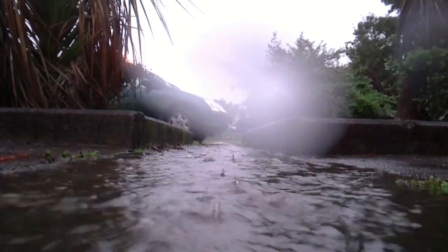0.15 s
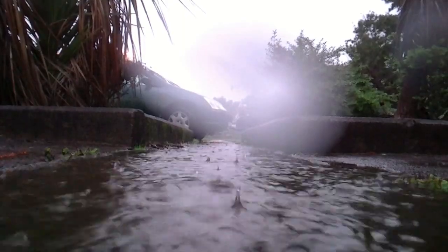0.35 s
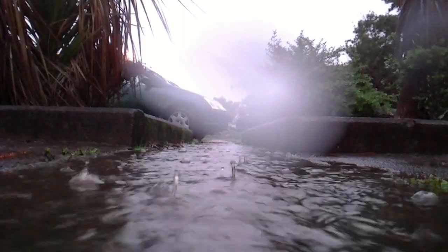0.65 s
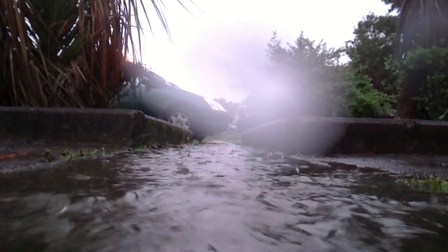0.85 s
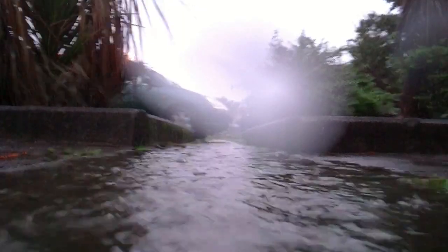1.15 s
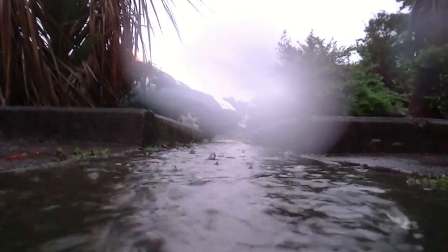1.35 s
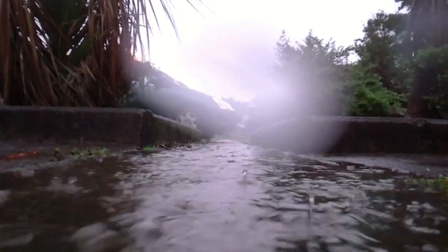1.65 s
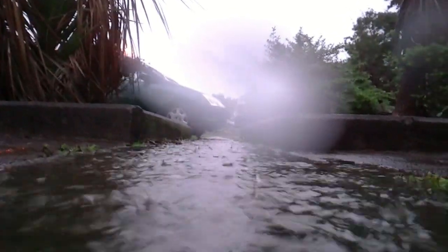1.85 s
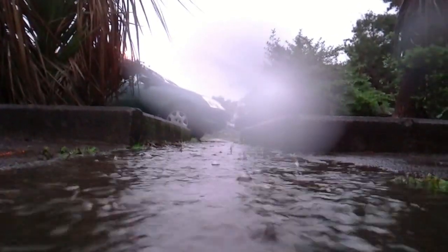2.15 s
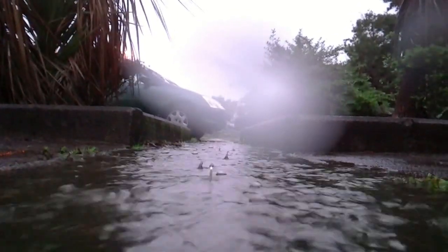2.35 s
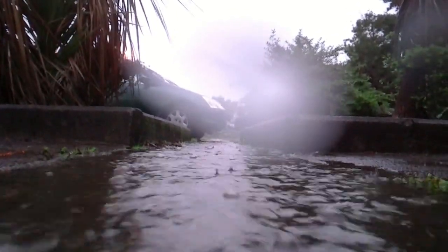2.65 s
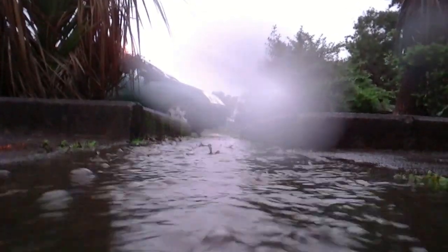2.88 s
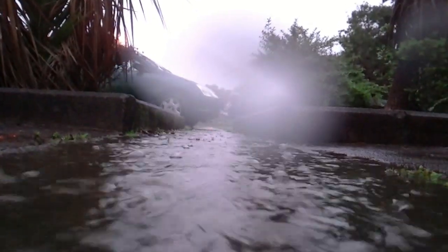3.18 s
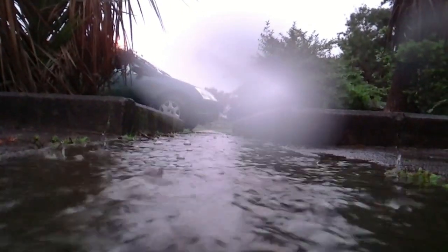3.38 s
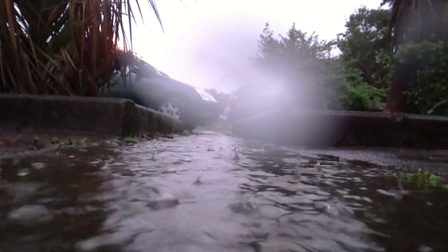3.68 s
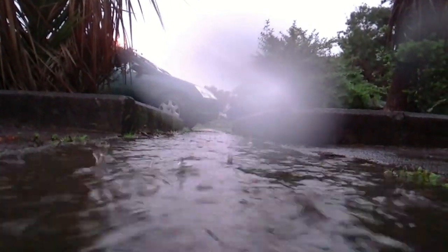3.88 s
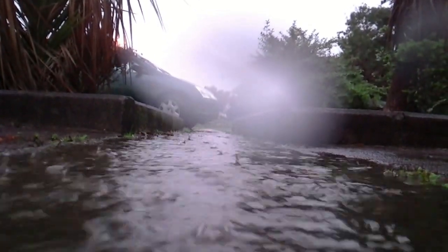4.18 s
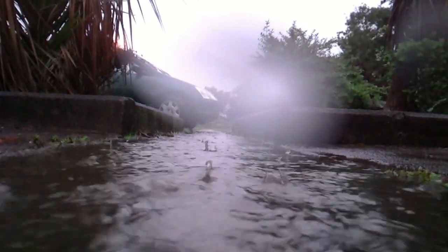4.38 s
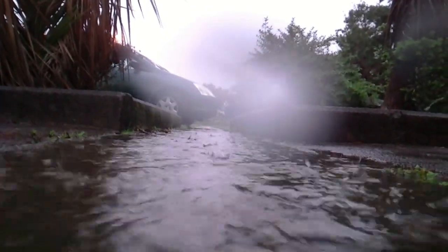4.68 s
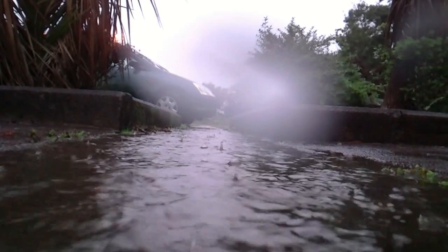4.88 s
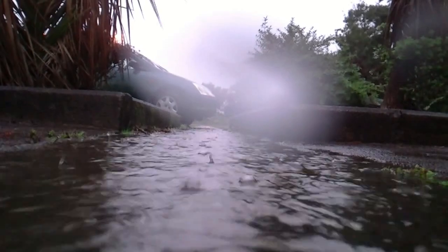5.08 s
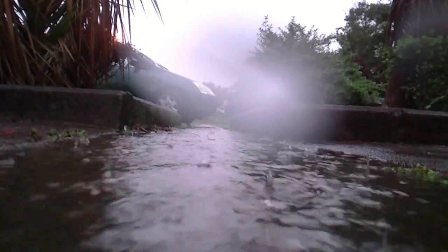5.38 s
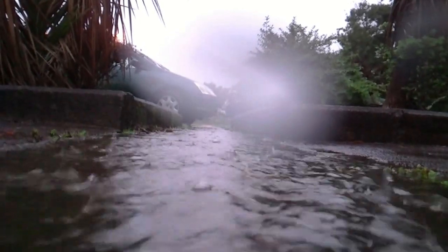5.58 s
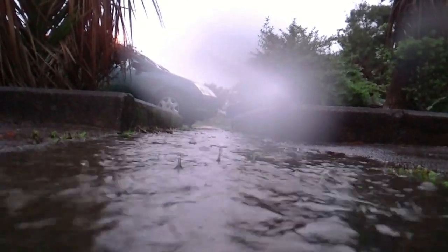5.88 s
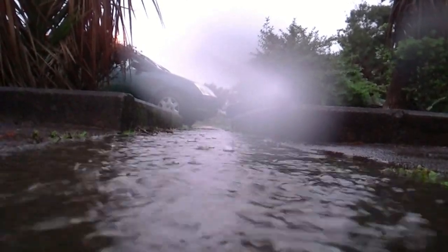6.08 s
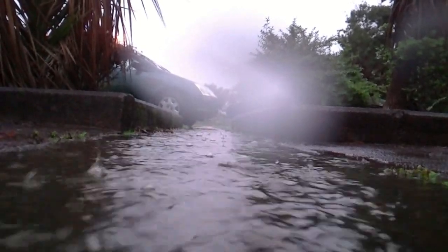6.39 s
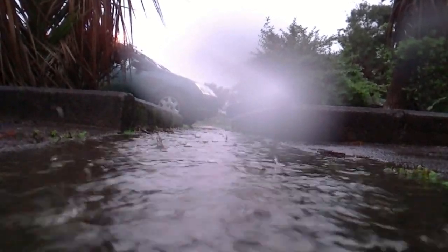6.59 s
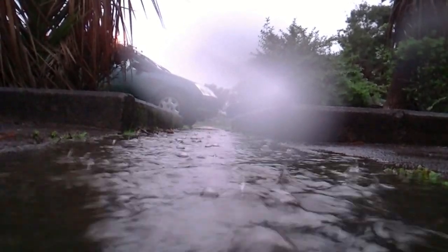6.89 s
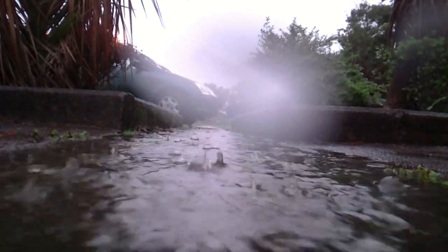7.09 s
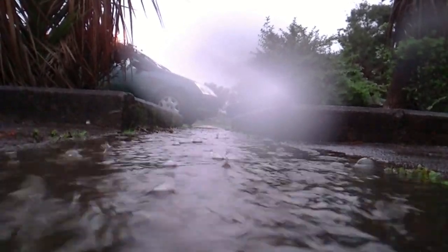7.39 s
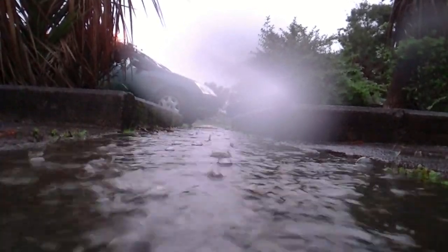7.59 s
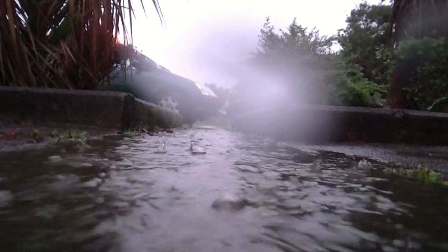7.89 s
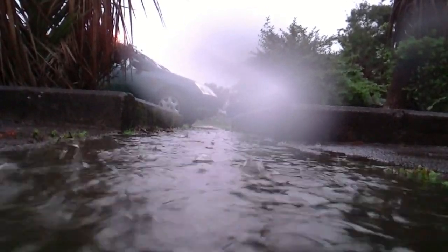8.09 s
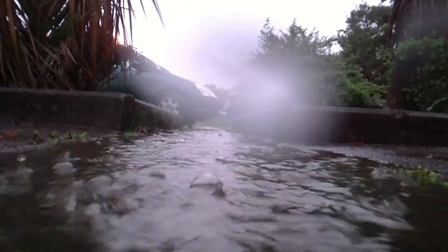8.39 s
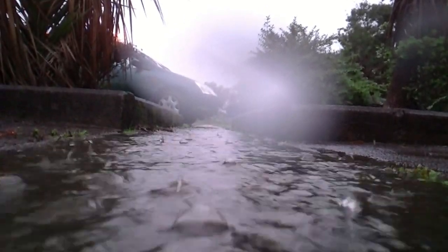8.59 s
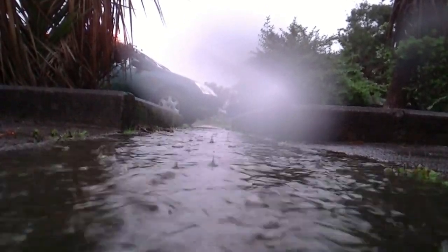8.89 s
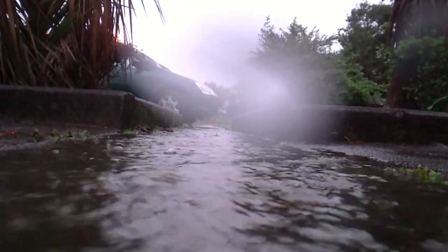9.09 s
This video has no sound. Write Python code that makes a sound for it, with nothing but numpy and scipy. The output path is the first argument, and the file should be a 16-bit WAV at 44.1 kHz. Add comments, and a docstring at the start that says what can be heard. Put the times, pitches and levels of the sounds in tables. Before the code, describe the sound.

A continuous bed of churning runoff and crackling rain, heard just above the water from inside a sealed case. Irregular knocks, splashes and quick round bubble pops fall in uneven clusters, thick in the first seconds, sparser around three to four. Bright stony pings stand out near five seconds. The rain swells slightly around two and a half seconds and again towards the end.

```python
"""Storm water runs down a street gutter in heavy rain, heard from a camera in a waterproof case just above the flow.
Throughout, current and far rain rush as shaped noise; near drops knock the case's resonances and air bubbles plop as
damped sines. Two thin warbles pass in the first second, and near 0.9 s a very hard drop makes the limiter duck it all.
The rain swells near 2.5 s, then eases; the strongest pings off wet stone come around 5 s. Another very hard drop
lands near 7.5 s, and the rain swells again before the end. A few low gulps of air dot the flow."""
import sys
import numpy as np
from scipy import signal
from scipy.fft import rfft, irfft, next_fast_len
from scipy.io import wavfile
from scipy.ndimage import uniform_filter1d, minimum_filter1d, map_coordinates

SR = 44100
rng = np.random.default_rng(int(sys.argv[2]) if len(sys.argv) > 2 else 0)


def pcm_store(signal):
    """Save signal as 16-bit PCM."""
    levels = np.round(np.clip(np.atleast_2d(signal), -1, 1) * 32767)
    wavfile.write(sys.argv[1], SR, levels.astype(np.int16).T)


N = 407925
TIME = np.arange(N) / SR

# big air bubbles: (time [s], level [dB], pitch [Hz], ring time to -60 dB [s], initial relative pitch rise [1/s])
BUBBLES = [(0.001, -10.5, 1426, 0.04, 5), (0.033, -21.5, 1470, 0.014, 3), (0.245, -30, 2044, 0.15, -3),
           (0.344, -20, 2430, 0.021, 3), (0.51, -9, 2470, 0.024, -3), (0.5422, 6.5, 2670, 0.02, -16),
           (0.6766, -17.5, 1690, 0.028, 0), (0.7168, -15.5, 3260, 0.025, 1), (0.74, -3.5, 2330, 0.039, -10),
           (0.778, -8, 3020, 0.02, -7), (0.8069, -0.5, 1576, 0.068, -5.5), (0.8799, -5.5, 1560, 0.016, 17),
           (0.899, 12, 1980, 0.011, -4), (0.905, -17, 1292, 0.075, 0), (0.938, -7, 2400, 0.036, -6),
           (0.9495, -8, 2200, 0.041, 9), (0.989, -2.5, 1212, 0.081, 5.5), (0.9987, 1, 1127, 0.05, 28.5),
           (1.009, -4.5, 1360, 0.034, 17), (1.055, -1, 1390, 0.049, 10.5), (1.143, -12, 2680, 0.028, 4),
           (1.21, 5, 1445, 0.025, 5), (1.2176, -0.5, 2330, 0.046, -3), (1.2336, -5, 2870, 0.024, -13),
           (1.2387, -4, 2630, 0.035, -5), (1.614, -24.5, 1540, 0.089, 2), (1.643, -12, 3020, 0.02, 10),
           (1.7746, -19, 1514, 0.17, 0), (1.8198, -14.5, 1380, 0.12, 10.5), (1.842, 1.5, 1272, 0.061, 10.5),
           (1.844, -8, 2930, 0.041, -7), (1.8573, -12.5, 1340, 0.092, 1.5), (1.8856, -10, 1230, 0.028, 19),
           (1.8994, -3.5, 1254, 0.043, 3), (1.911, -14, 1410, 0.054, -4), (1.9878, -11.5, 1630, 0.1, -13.5),
           (2.0634, -15.5, 2030, 0.026, -3), (2.0718, -16.5, 2770, 0.023, 0), (2.138, 1, 1365, 0.043, 17),
           (2.18, -3.5, 2630, 0.021, 15), (2.2346, -23.5, 1390, 0.066, 0), (2.323, -17, 2470, 0.038, 1),
           (2.4176, -13, 1460, 0.03, -2), (2.4301, -10, 2580, 0.028, -1), (2.458, -9, 2790, 0.022, -6),
           (2.538, -11.5, 1990, 0.022, -3), (3.028, -30, 1410, 0.15, 0), (3.0573, -9.5, 1515, 0.032, -13),
           (3.126, -24, 2070, 0.04, -5), (3.167, -15.5, 1970, 0.02, -4), (3.5721, 1, 1130, 0.021, 14),
           (3.5835, -2, 1247, 0.034, 8.5), (3.729, -13.5, 1525, 0.031, 7), (4.035, 3.5, 2120, 0.02, 5),
           (4.0675, -8.5, 1655, 0.058, -5.5), (4.192, -25, 1780, 0.05, 6), (4.233, -11.5, 1690, 0.031, 1),
           (4.454, -20.5, 1955, 0.049, -6), (4.55, -21, 1213, 0.05, 21), (4.714, -17.5, 1040, 0.033, 26),
           (4.9737, 1.5, 2010, 0.017, -16), (5.179, -5, 2250, 0.02, 1), (5.2438, 0.5, 1288, 0.059, 18),
           (5.415, -7, 1000, 0.024, 33), (5.5213, -11, 1430, 0.02, 10), (6.226, -8, 1625, 0.08, -1.5),
           (6.2425, -5, 1485, 0.029, 8), (6.262, -16, 1930, 0.042, -2), (6.29, -8, 1675, 0.062, -6),
           (6.357, -17, 2700, 0.035, 4), (6.928, -6.5, 2140, 0.018, 5), (7.142, -21, 1330, 0.089, -7.5),
           (7.1855, -12.5, 1530, 0.013, 5), (7.47, -20.5, 2730, 0.04, -4), (7.4905, 11, 1670, 0.035, 0.5),
           (7.5756, -3.5, 1425, 0.05, 8), (7.767, 2, 1495, 0.045, -0.5), (7.865, -16, 1180, 0.14, 10),
           (8.028, -14, 2820, 0.032, -6), (8.1549, -13.5, 1400, 0.025, -3), (8.438, -12, 1440, 0.014, -5)]


def amp(db):
    """Decibels to gain."""
    return 10 ** (np.asarray(db) / 20)


def unit(x):
    """Scale to rms 1."""
    return x / np.sqrt(np.mean(x ** 2) + 1e-20)


def blow(sounds, size=300):
    """Scale each row to rms 1 over its first 7 ms."""
    return sounds / np.sqrt(np.mean(sounds[:, :size] ** 2, axis=1, keepdims=True) + 1e-20)


def along(points, hz, axis=1):
    """Read one column of a frequency table on a log axis."""
    table = np.transpose(points)
    return np.interp(np.log(hz + 1), np.log(table[0] + 1), table[axis])


def wobble(rate):
    """A smooth random curve with rate knots a second."""
    return map_coordinates(rng.standard_normal(int(N * rate / SR) + 4), [TIME * rate])


def filtered(x, response):
    """Multiply the spectrum of x by a complex response of frequency."""
    n = x.shape[-1]
    padded = next_fast_len(n + n // 8)
    return irfft(rfft(x, padded) * response(np.fft.rfftfreq(padded, 1 / SR)), padded)[..., :n]


def scatter(times, sounds, pan_db, lag=0, side=None):
    """Lay a short sound at each time; positive side is louder and up to lag [s] earlier on the left."""
    if side is None:
        side = np.clip(rng.standard_normal((len(times), 1)), -2, 2) / 2
    else:
        side = side[:, None]
    loudness = np.sqrt((amp(2 * side * pan_db) + amp(-2 * side * pan_db)) / 2)
    index = np.arange(sounds.shape[1])
    channels = []
    for sign in (1, -1):
        start = np.round(np.abs(times[:, None] - sign * side * lag / 2) * SR).astype(int)
        panned = sounds * (amp(sign * side * pan_db) / loudness)
        channels.append(np.bincount((start + index).ravel(), panned.ravel(), N)[:N])
    return np.array(channels)


def near_drops(level_db, thud_db, spray_db):
    """Big drops land on and beside the case, each with its own force, thud and spray."""
    # drops: (time [s], force [dB], thud: low knock over case ring [dB], spray: splash over force [dB])
    drop_rows = [(0.1783, -27, -13, -2), (0.4946, -21.5, -20, -1), (0.5103, -25.5, -9, -29),
                 (0.538, -22.5, -4, -13), (0.715, -25, -6, -13), (0.7388, -16, -9.5, -20),
                 (0.7762, -15.5, 0, -7), (0.8059, -19, -8, 3.5), (0.8988, 2, -8, -7), (0.937, -11, -17, -9),
                 (0.994, -16, 14, -28), (1.059, -23.5, -3, -29), (1.099, -13.5, -6, -6.5),
                 (1.154, -26, -5, -3), (1.1852, -24, -11, -0.5), (1.2153, -13.5, -18, 3),
                 (1.2314, -16, -3, -4), (1.247, -8, -14, 0), (1.3048, -25, -10, -16), (1.324, -28, -17, -4),
                 (1.6424, -23.5, -5.5, -5), (1.703, -23.5, -9, -27), (1.743, -18.5, 5, -0.5),
                 (1.8172, -24, 8, -25), (1.8445, -23, 1, 8), (1.897, -17, 15, -6.5), (1.9862, -22, -1, -9),
                 (2.01, -19, -19, -38), (2.046, -22, -2, -3), (2.071, -23, -11, -22), (2.137, -24.5, -8, 0),
                 (2.179, -19, -11.5, -7), (2.293, -16.5, -11.5, -10), (2.32, -21.5, -15, 2.5),
                 (2.3696, -17.5, -6, -9), (2.389, -19, -1, -2.5), (2.4281, -20.5, -10.5, -23),
                 (2.457, -21.5, -6, 2), (2.4862, -1, -9.5, -4), (2.7305, -18.5, -2, -6),
                 (2.7391, -21, 10, -19), (2.7911, -24, -22, -6), (2.836, -24, -5, -16),
                 (2.949, -26.5, 1, -5), (3.056, -27.5, 14, 7), (3.1658, -29, -38, -5),
                 (3.332, -27, -22, -1), (3.3793, -27.5, -21, 1), (3.466, -23.5, -19, -2.5),
                 (3.4965, -16, -13.5, -9), (3.5693, -14.5, -1, -8.5), (3.654, -29, -2, -3),
                 (3.7258, -23, -3, 3), (3.9703, -25, -12.5, -11), (4.01, -25.5, -3, -1.5),
                 (4.0354, -13, -11, -4), (4.4724, -27, -4, -24), (4.6472, -28.5, -11.5, -0.5),
                 (4.808, -16, -15.5, -1.5), (4.837, -26, -12, -5), (4.8667, -16.5, -1.5, -10),
                 (4.9712, -18, -17, 9), (5.004, -13, -3.5, -2.5), (5.243, -20.5, -5, -11),
                 (5.3849, -15.5, -6.5, 3), (5.4141, -16.5, -8, -0.5), (5.4928, -20, -7.5, -27),
                 (5.698, -18.5, -4.5, -6.5), (5.9889, -32, -28, 0), (6.03, -29, -14, -2),
                 (6.0738, -25.5, -18, -4), (6.2297, -25.5, -7, -5), (6.2579, -24.5, -6, 0),
                 (6.355, -24, -22, -2), (6.3761, -26, -27, -6), (6.435, -31, -3, 0),
                 (6.8847, -25.5, -6.5, -13), (6.955, -23.5, 3, -1), (6.9802, -25, -17, 2),
                 (7.1227, -26, -1, -28), (7.2261, -11.5, -20.5, -9.5), (7.48, -23, 1, -13),
                 (7.4908, 0, 13, -5.5), (7.572, -24, 13, 11), (7.7637, -17, -10, -27),
                 (7.833, -14, -16.5, -17), (7.8838, -16.5, -20, -7.5), (7.901, -27.5, -8, 1),
                 (7.9854, -11.5, 7, -19), (8.0262, -22.5, -4, -37), (8.2228, -28.5, -8.5, 0),
                 (8.324, -6.5, -8, -11.5), (8.422, -22, 6, -4), (8.608, -23.5, -21, 4.5),
                 (8.707, -21, -18.5, -0.5), (8.77, -26, 0, 0), (8.8867, -24, 0, -10), (9.0748, -7, -9.5, 5),
                 (0.531, -22.5, 1, -5), (0.757, -26, -12, -8), (1.542, -30, 5, -15),
                 (1.574, -28.5, -10, -7), (1.722, -31, -3, -14), (1.828, -29, 2, -12), (2.119, -33, -15, 0),
                 (2.362, -23.5, -1, 7), (2.477, -23.5, -4, -6), (2.598, -28.5, 3, -26),
                 (2.874, -33, -13, -9), (3.074, -31, -6, 3), (4.536, -30.5, -10, -7), (4.588, -30, -3, -9),
                 (4.664, -30.5, -6, 4.5), (4.853, -28.5, 3.5, -5), (5.026, -27, -18, -15),
                 (5.079, -29, -10, -6), (5.473, -29, -13, 1), (5.534, -31, 5, -5), (5.581, -32.5, -3, 1),
                 (5.621, -33.5, -2, 6), (5.868, -31, -21, -3), (6.058, -30, -8, -10), (6.321, -31, -3, -3),
                 (6.679, -31.5, -22, -1), (6.937, -23.5, -23, -1), (6.969, -27, -9, -5),
                 (7.106, -28, -8, -8), (7.364, -30.5, -11, 3), (7.47, -25.5, -12, 2), (7.675, -26, -9, -13),
                 (7.933, -28, -10, -6), (8.073, -27.5, -2, -16), (8.574, -27, -17, -1),
                 (8.688, -27, -17, -6), (8.818, -31.5, -24, -6), (9.022, -29.5, -9, -7)]
    s, force, thud, spray = np.transpose(drop_rows)
    return landing(s, force + level_db, thud + thud_db, spray + spray_db)


def landing(s, force_db, thud_db, spray_db):
    """A drop's force is shared between low knock and case ring; splash and crack grow with its spray."""
    ring_db = force_db - 10 * np.log10(1 + amp(thud_db) ** 2)
    splash_db = force_db + spray_db
    crack_db = -18.5 + 0.58 * splash_db  # the crack grows more slowly than the splash
    return impacts(s, ring_db + thud_db, ring_db, splash_db, crack_db)


def impacts(s, knock_db, ring_db, splash_db, crack_db):
    """A drop cracks on contact, opens a small crater in the water and sets the case ringing."""
    # low resonances of the case: (centre [Hz], width [Hz], relative level [dB])
    knock_modes = [(279, 220, -13.5), (489, 116, -4.5), (687, 117, 1), (934, 476, -9)]
    # high resonances of the case: (centre [Hz], width [Hz], relative level [dB])
    ring_modes = [(1035, 154, 3), (1284, 326, 3.5), (1538, 132, 9.5), (1823, 260, -4), (2200, 420, -12)]
    # resonances of the splash: (centre [Hz], width [Hz], relative level [dB])
    splash_modes = [(2276, 159, 6.5), (2530, 800, -3.5), (3360, 200, -4)]
    count = len(s)
    # the hardest drops hit the case in one cleaner slap
    mess = np.interp(np.maximum(knock_db, ring_db), [-27, -17], [1, .25])[:, None]
    rim = mess * crown(count)
    knock_push = contact(count, t60=0.0051, rough=0.3 * mess) + rim
    knock = amp(knock_db)[:, None] * struck(knock_push, knock_modes, low_hz=102, detune=0.033)
    ring_push = contact(count, t60=0.003, rough=0.16 * mess) + rim
    ring = amp(ring_db)[:, None] * struck(ring_push, ring_modes, low_hz=700, detune=0.08)
    splash_push = contact(count, t60=0.013, rough=0.4 * mess) + rim
    splash = amp(splash_db)[:, None] * struck(splash_push, splash_modes, low_hz=1900, detune=0.08)
    crack = amp(crack_db)[:, None] * cracks(crack_db)
    # the case carries the low part to both ports nearly alike; the spray comes from either side
    return scatter(s, knock + ring, pan_db=1.2) + scatter(s, splash + crack, pan_db=6, lag=.00006)


def contact(count, t60, rough, size=1500):
    """The push of each drop: one sharp slap, then a brief irregular collapse."""
    t = np.arange(size) / SR
    push = rough * rng.standard_normal((count, size)) * amp(-60 * t / t60)
    push[:, 0] += 1
    return push


def crown(count, size=1500, order=3):
    """A few weaker slaps at uneven moments as the rim of the splash falls in."""
    latest_s, slap_db = .014, -8.5
    when = rng.uniform(.15, 1, (count, order))
    strength = rng.standard_normal((count, order))
    place = np.minimum(when * latest_s * SR, size - 1).astype(int) + size * np.arange(count)[:, None]
    slaps = amp(slap_db) * strength * (1 - when / 2)
    return np.bincount(place.ravel(), slaps.ravel(), count * size).reshape(count, size)


def struck(push, modes, low_hz, detune):
    """Pushes excite resonances, shifted a little by the water at each drop; the case dulls the top treble."""
    shift = 1 + detune * rng.uniform(-0.76, 1, (len(push), 1))

    def body(f):
        total = 0
        for k, (hz, width, db) in enumerate(modes):
            centre = hz * shift
            mode = 1j * f * width / (centre * centre - f * f + 1j * f * width)
            total = total + (-1) ** k * amp(db) * mode
        return total

    case = signal.butter(2, [low_hz, 6500], "band", fs=SR, output="sos")
    return blow(signal.sosfilt(case, filtered(push, body)))


def cracks(crack_db):
    """First contact gives a very short snap; only the hardest ones reach the top treble."""
    # spectrum of the snap: (frequency [Hz], relative level [dB])
    snap_spectrum = [(2500, -17), (3600, 6.5), (4400, 12), (5500, 5.5), (6500, 4.5), (7400, -4),
                     (9000, -13), (11500, -26), (13700, -20), (15500, -38), (16500, -68)]
    # above -16.5 dB a crack opens the top treble by 2.07 dB per dB
    hardness_db = np.clip(2.07 * (crack_db + 16.5), 0, 22)[:, None]
    push = contact(len(crack_db), t60=.008, rough=.5)
    # room for the snap to swell over a fraction of a millisecond before its peak
    push = np.roll(push, 30, axis=1)

    def colour(hz):
        top = np.interp(hz, [6500, 11000], [0, 1])
        return amp(along(snap_spectrum, hz) + hardness_db * top)

    return blow(filtered(push, colour))


def plops(level_db, life, sway, attack):
    """Big bubbles near the case ring until they burst; their swaying shape makes the ring swell and sag."""
    s, db, hz, t60, rise = np.transpose(BUBBLES)
    rings = ringing_air(db + level_db, hz, t60, rise, attack=attack, size=2600)
    t = np.arange(rings.shape[1]) / SR
    sway_hz = rng.uniform(60, 150, (len(s), 1))
    swell = 1 + sway * np.cos(2 * np.pi * sway_hz * t)
    burst = np.exp(-(t / life) ** 4)
    return scatter(s, rings * swell * burst, pan_db=0.5)


def ringing_air(db, hz, t60, rise, attack, size):
    """A bubble is a damped sine whose pitch climbs (or falls, if rise is negative) and then levels off."""
    glide_s = 0.0224  # time constant of the levelling off
    t = np.arange(size) / SR
    db, hz, t60, rise = (np.asarray(c)[:, None] for c in (db, hz, t60, rise))
    envelope = amp(db - 60 * t / np.abs(t60)) * (1 - np.exp(-t / attack))
    glide = rise * glide_s * (t - glide_s * (1 - np.exp(-t / glide_s)))
    return envelope * np.sin(2 * np.pi * hz * (t + glide))


def shed_bubbles(pitch_spread, count=32):
    """Weaker bubbles of about the same size follow the big ones."""
    mean_delay_s, ring_cycles = 0.024, 77
    parent, delay, level, pitch, rise = rng.uniform(-1, 1, (count, 5)).T
    chosen = (np.abs(parent) * len(BUBBLES)).astype(int)
    s, _, hz, _, _ = np.array(BUBBLES)[chosen].T
    shed_hz = hz * np.exp(pitch_spread * pitch)
    rings = ringing_air(-24 + 2 * level, shed_hz, ring_cycles / hz, 2 + 8 * rise, attack=0.00034, size=2600)
    return scatter(s + mean_delay_s * (1 + delay), rings, pan_db=3.0)


def ticks(level_db, t60):
    """Droplets on wet stone give a crack and a bright, very short ping."""
    # droplets: (time [s], level [dB], ping pitch [Hz], gain to the left and loss to the right before
    # loudness is evened out [dB], crack over ping [dB])
    droplet_rows = [(0.2177, -21, 6150, 4, -27), (0.3676, -14.5, 4060, -4, -29),
                    (0.4253, -18, 5240, -7, -16), (1.325, -18.5, 6300, -0.5, -27),
                    (1.441, -17, 4420, -5, -20), (1.968, -25, 6400, 1, -22), (2.642, -20.5, 5330, -8, -9),
                    (2.731, -26, 5200, 3, -6.5), (2.8303, -20, 6200, -1, -28), (2.99, -24, 5530, 2, -11.5),
                    (3.848, -17, 4200, 0, -26.5), (3.9723, -21, 7040, 7, -19.5),
                    (4.2196, -21, 6340, -3, -17), (4.8092, -12.5, 5000, 8, -15),
                    (4.8663, -17.5, 5900, -2, -28), (4.9709, -1.5, 6400, 1, -9.5),
                    (4.973, -5.5, 4370, -23, -5.5), (5.0912, -21, 3550, 10, -11),
                    (5.1106, -4, 3770, -3.5, -22.5), (5.3369, -4.5, 3850, -4.5, -34),
                    (5.4154, -17, 3280, 1, -15), (5.7561, -13.5, 3360, -4, -20),
                    (5.99, -18.5, 6380, 0, -27), (6.187, -16.5, 3200, 0, -15), (6.222, -12, 3970, -6, -33),
                    (6.2602, -21, 6500, -7, -28), (6.5203, -20.5, 4700, -6, -8),
                    (6.585, -14, 3840, -7, -20), (6.6022, -11, 3880, -3, -27),
                    (7.0402, -7.5, 4000, -2.5, -12), (7.6754, -15, 3620, -3, -19),
                    (8.4208, -17, 6100, -2, -24), (8.596, -21.5, 5100, -8, -6.5),
                    (8.626, -18, 5900, 1, -28), (8.742, -15, 5200, -2, -16), (8.819, -20, 5730, -6, -22)]
    s, db, hz, pan, crack = np.transpose(droplet_rows)
    crack_db = db + level_db + crack
    snaps = amp(crack_db)[:, None] * cracks(crack_db)
    ring_s, rise = np.full(len(s), t60), rng.normal(0, 34, len(s))
    pings = ringing_air(db + level_db, hz, ring_s, rise, attack=0.000067, size=snaps.shape[1])
    return scatter(s, pings + snaps, pan_db=1.0, side=pan)


def gulps(level_db, t60, rise):
    """The current now and then swallows a large pocket of air, which rings low."""
    # gulps: (time [s], relative level [dB], pitch [Hz])
    gulp_rows = [(1.417, -39, 104), (4.417, -40, 104), (4.563, -35, 202), (6.597, -35.5, 270)]
    s, db, hz = np.transpose(gulp_rows)
    ring_s, rises = np.full(len(s), t60), np.full(len(s), rise)
    rings = ringing_air(db + level_db, hz, ring_s, rises, attack=0.0025, size=4000)
    return scatter(s, rings, pan_db=15)


def patter(knock_db, ring_db, splash_db, crack_db, count=480):
    """Many lighter drops strike at random moments, each with its own force and colour."""
    s = rng.uniform(0, N / SR, count)
    force_db = rng.uniform(-6, 6, (count, 1))
    colour_db = rng.uniform(-5, 5, (count, 4))
    levels = force_db + colour_db + [knock_db, ring_db, splash_db, crack_db]
    return impacts(s, *levels.T)


def crackle(level_db, centre_hz, cycles, vary_db, count=3600):
    """Countless tiny drops around the case, each a tick of a few cycles."""
    when, pitch, size = rng.uniform(0, 1, (count, 3)).T
    hz = centre_hz * 2 ** (1.2 * (pitch - .5))
    db = level_db - vary_db * np.log(size + .02)  # a few stand out
    pings = ringing_air(db, hz, cycles / hz, np.zeros(count), attack=.00005, size=200)
    return scatter(when * N / SR, pings, pan_db=9.5)


def small_bubbles(level_db, centre_hz, width, cycles, count):
    """A swarm of small bubbles in the flow; smaller ones ring higher and die sooner."""
    hz = centre_hz * np.exp(width * rng.standard_normal(count))
    hz = np.clip(hz, 400, rng.uniform(5800, 7000, count))
    db = level_db + 5 * np.minimum(rng.exponential(1, count), 2.4)
    rings = ringing_air(db, hz, cycles / hz, rng.normal(3.6, 5.9, count), attack=0.00025, size=1600)
    return scatter(rng.uniform(0, N / SR, count), rings, pan_db=8)


def ports(x):
    """The two microphone ports colour near sounds; a cavity behind the right one turns the phase over."""
    # colour of the ports: (frequency [Hz], left [dB], right [dB])
    port_colour = [(260, 3.5, -2.5), (694, 1, 4), (1650, 0.5, -0.84), (2040, 1.5, 2), (2640, 6, -5),
                   (3870, 0.5, -4), (5970, 3, -0.4)]
    cavity_hz, width_hz = 2338, 575

    def response(hz):
        pole = cavity_hz ** 2 - hz ** 2 + 1j * hz * width_hz
        left = amp(along(port_colour, hz))
        right = amp(along(port_colour, hz, axis=2)) * np.conj(pole) / pole
        return np.array([left, right])

    return filtered(x, response)


def rush(current_db, hiss_db):
    """The current churns; distant rain is a dense crackle that merges into hiss."""
    # spectrum of the current: (frequency [Hz], relative level [dB])
    current_spectrum = [(25, -36), (60, -23), (130, -6.5), (260, -2.5), (400, -4), (690, -3.5), (920, -10),
                        (1500, -1), (1950, -0.5), (2500, -5.5), (4000, -39)]
    # spectrum of the distant rain: (frequency [Hz], relative level [dB])
    hiss_spectrum = [(1200, -53), (2000, -25), (2700, -3), (4300, 0.5), (5400, -2), (6400, -0.5),
                     (7100, -11), (8000, -18), (9600, -36), (10700, -21.5), (12000, -34), (16000, -63)]
    churn_db = .8 * wobble(3) + 1.2 * wobble(25)
    current = amp(current_db + churn_db) * spread(patchy_noise(patchy_db=1.5), current_spectrum)
    far_rain = patchy_noise(patchy_db=1.5) * amp(0.93 * wobble(900))
    hiss = amp(hiss_db + 1.37 * wobble(21.0)) * spread(far_rain, hiss_spectrum)
    return current + hiss


def patchy_noise(patchy_db):
    """Two noises whose level drifts in patches of time and frequency."""
    z = signal.stft(rng.standard_normal((2, N)), nperseg=512)[2]
    field = uniform_filter1d(rng.standard_normal(z.shape[1:]), size=6, axis=0)  # over frequency
    field = uniform_filter1d(field, size=8, axis=1)  # over time
    return unit(signal.istft(z * amp(patchy_db * unit(field)), nperseg=512)[1][:, :N])


def spread(pair, spectrum):
    """Two unrelated signals become one coloured stereo field of rms 1."""
    # left-right likeness of the rush: (frequency [Hz], coherence [-1 to 1])
    likeness = [(60, -0.55), (230, -0.56), (450, -0.57), (700, 0.66), (1400, 0.44), (1900, 0.53),
                (3000, 0.64), (4300, 0.57), (6000, -0.35)]

    def response(hz):
        turn = np.arccos(np.clip(along(likeness, hz), -1, 1)) / 2
        return amp(along(spectrum, hz)) * [np.cos(turn), np.sin(turn)]

    mid, side = filtered(pair, response)
    return unit(np.array([mid + side, mid - side]))


def whistle():
    """Faint, thin, unsteady warbles, perhaps a far bird: sines with a regular warble and a random quaver."""
    # warbles: (start [s], length [s], level before random flutter [dB], centre pitch [Hz])
    warble_rows = [(0.22, 0.09, -39, 4000), (0.567, 0.165, -37, 4220)]
    warble_hz, warbles_per_s, quaver_hz = 240, 10.6, 90
    sound = np.zeros(N)
    for start, length, db, pitch in warble_rows:
        t = TIME - start
        hz = pitch + warble_hz * np.cos(2 * np.pi * warbles_per_s * t) + quaver_hz * wobble(400)
        swell = np.sqrt(np.abs(np.sin(np.pi * np.clip(t / length, 0, 1))))
        sound += amp(db + 4 * wobble(70)) * swell * np.sin(2 * np.pi * np.cumsum(hz) / SR)
    return sound


def scene():
    """Near drops and bubbles over a bed that swells with the downpour."""
    # strength of the downpour: (time [s], level [dB])
    downpour = [(0, -1.5), (.3, 0), (2, 0), (2.5, 2), (3.2, -1.1), (4.5, -1), (5.5, 0.5), (6.2, -1),
                (8.6, 1.1), (9.25, -2)]
    shower_s, shower_db = np.transpose(downpour)
    shower = amp(np.interp(TIME, shower_s, shower_db))
    drops = near_drops(level_db=-1.0, thud_db=4.0, spray_db=-2.0)
    bubbles = plops(level_db=0.0, life=0.054, sway=0.2, attack=0.00033) + shed_bubbles(pitch_spread=0.09)
    near = drops + bubbles + ticks(level_db=0.0, t60=0.011) + gulps(level_db=6, t60=0.028, rise=3.2)
    light = patter(knock_db=-48.5, ring_db=-49.5, splash_db=-47.5, crack_db=-54.5)
    gurgle = small_bubbles(level_db=-38.5, centre_hz=1802, width=0.253, cycles=69, count=260)
    fizz = small_bubbles(level_db=-33.5, centre_hz=4644, width=0.276, cycles=51, count=520)
    trickle = small_bubbles(level_db=-40.0, centre_hz=2235, width=0.44, cycles=27.0, count=900)
    rain = crackle(level_db=-41, centre_hz=4150, cycles=23, vary_db=4.0)
    close = ports(near + shower * (light + gurgle + trickle + fizz + rain))
    return close + shower * rush(current_db=-42.0, hiss_db=-38.0) + whistle()


def limiter(x, ceiling_db, release, size=45):
    """The gain drops within about a millisecond around a loud hit and creeps back."""
    power = np.abs(uniform_filter1d(np.max(x ** 2, axis=0), size))
    excess_db = np.maximum(10 * np.log10(power + 1e-12) - ceiling_db, 1e-6)
    # each excess decays exponentially until a larger one takes over
    held_db = np.exp(np.maximum.accumulate(np.log(excess_db) + TIME / release) - TIME / release)
    return x * uniform_filter1d(minimum_filter1d(amp(-held_db), size), size)


def record(dry):
    """The camera limits loud hits, clips what slips through and keeps nothing above its band limit."""
    limited = limiter(dry, ceiling_db=-7.5, release=0.091)
    return filtered(np.clip(limited, -1, 1), lambda hz: hz < 16300)


dry = scene()
out = record(dry)
pcm_store(out)
```